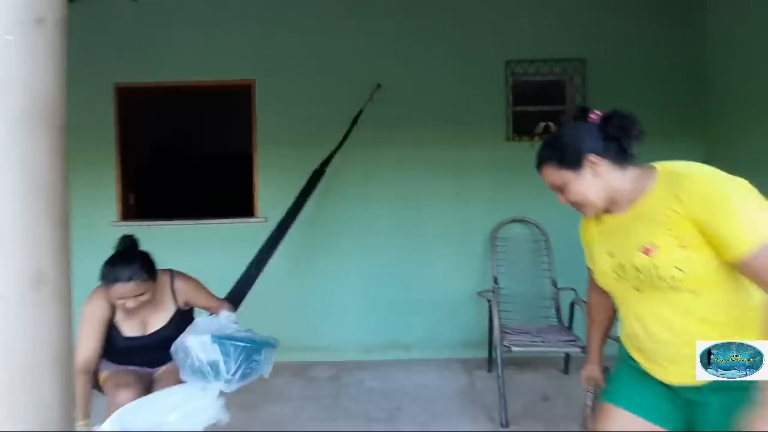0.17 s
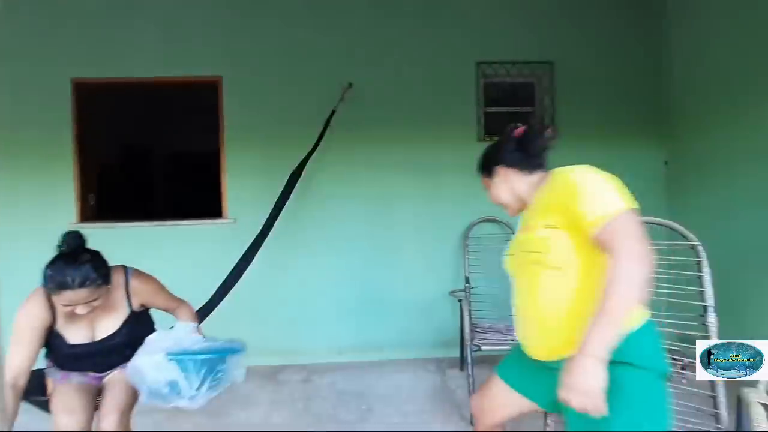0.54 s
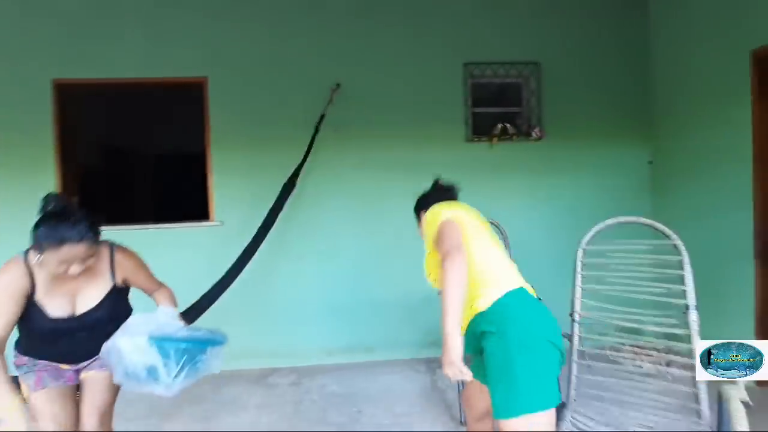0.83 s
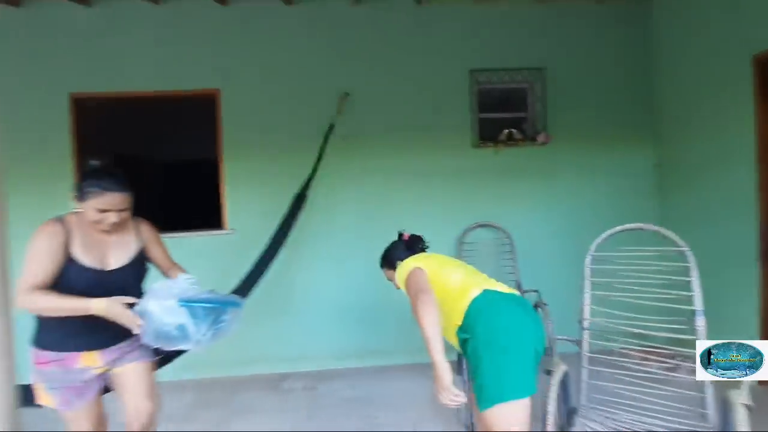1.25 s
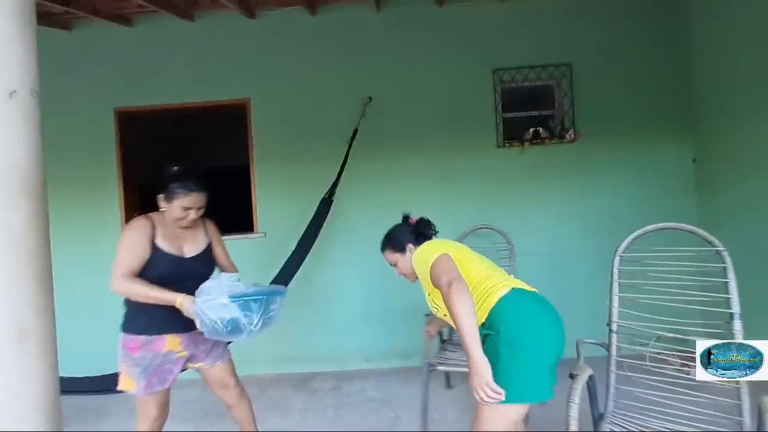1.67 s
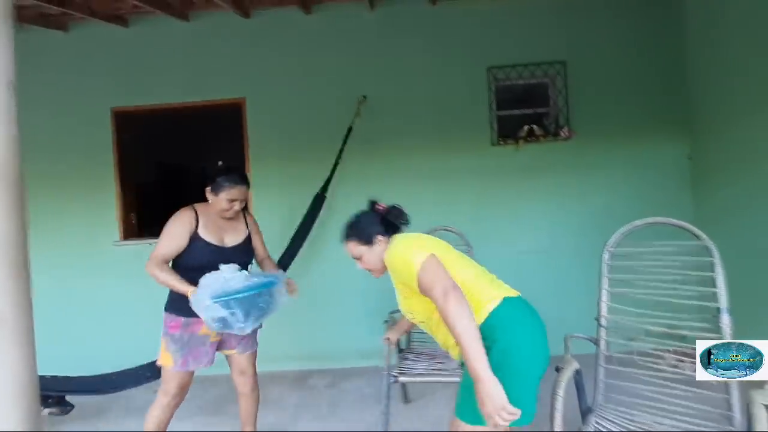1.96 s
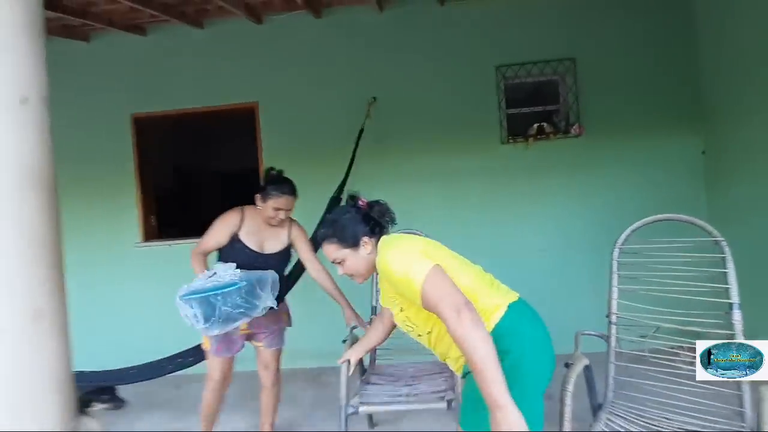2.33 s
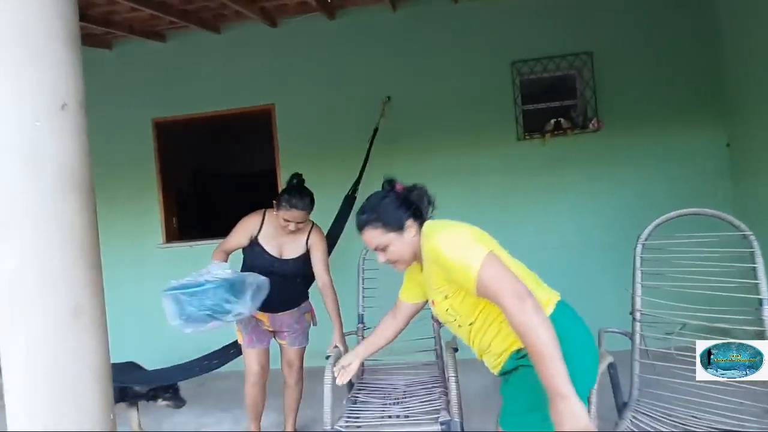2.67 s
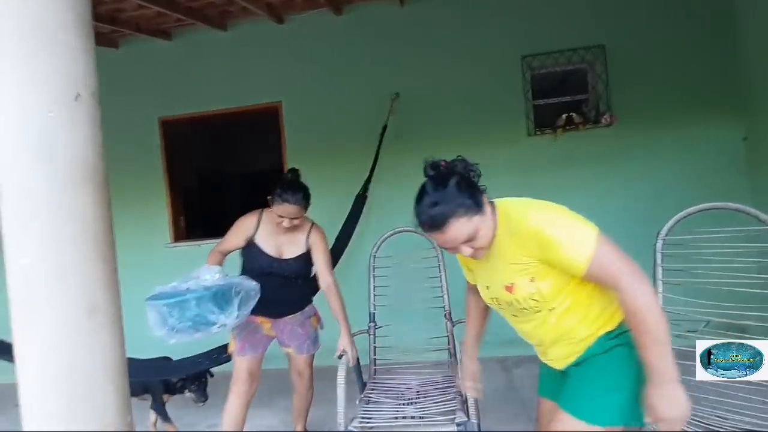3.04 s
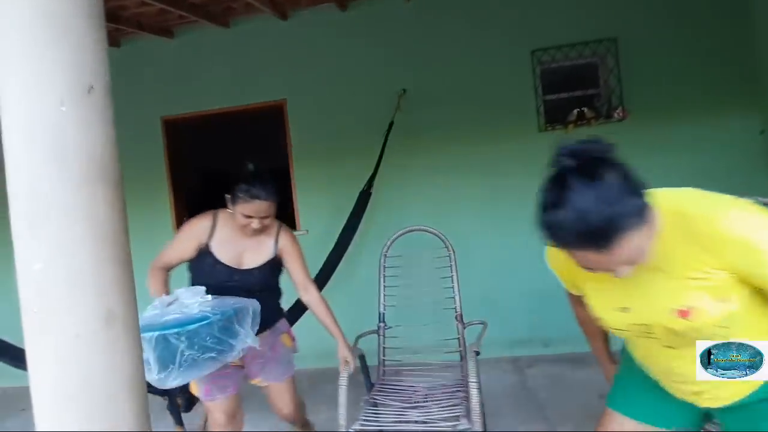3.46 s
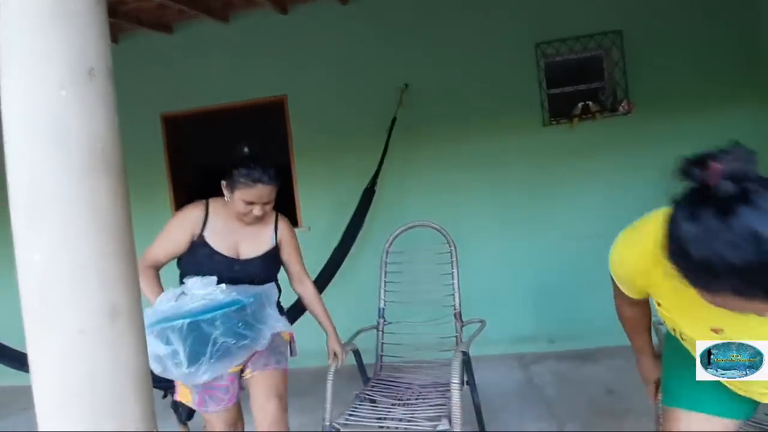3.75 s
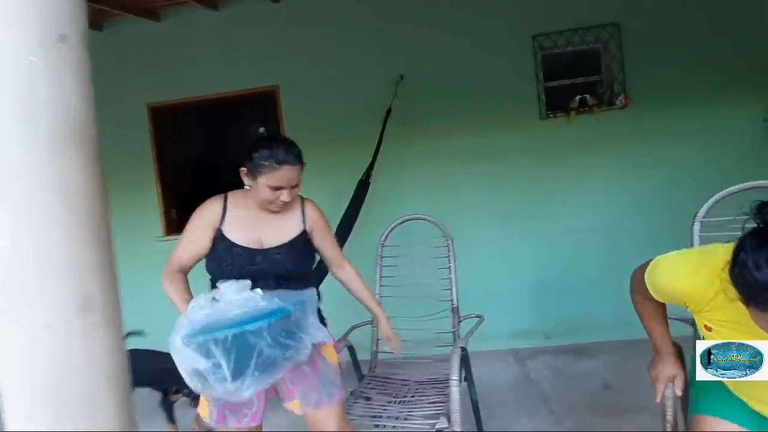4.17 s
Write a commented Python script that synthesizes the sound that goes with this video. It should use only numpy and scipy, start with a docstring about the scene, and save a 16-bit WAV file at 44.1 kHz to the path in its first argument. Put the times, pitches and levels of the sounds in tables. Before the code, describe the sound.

Plastic rustles as a chair knocks down on a porch floor; a long grating metal drag follows, then a brief scrape and soft shuffling.

```python
"""A roofed concrete porch, heard in stereo with its short echo; insects hiss far off in still air.
Tubular steel chairs are close by. One is set down with a double knock, then one is dragged in a long scrape
and a shorter one: grainy friction clicks, pulsing in lurches, drive the resonances of frame and seat.
Catching feet strike that frame, grains tick, narrow noise bands rasp, and a tube rings on as beating sines.
Around the scrapes a plastic bag rustles in tiny snaps and feet shuffle as swells of coloured noise."""
import sys
import numpy as np
from scipy import signal
from scipy.fft import rfft, irfft
from scipy.io import wavfile
from scipy.ndimage import uniform_filter1d

SR = 44100
rng = np.random.default_rng(int(sys.argv[2]) if len(sys.argv) > 2 else 0)


def digitize_waveform(pressure):
    """Quantize a signal to 16-bit integers and store it at the path in sys.argv[1].

    Rows of a 2-D input are taken as channels; values are limited to [-1, 1].
    """
    field = np.atleast_2d(pressure).T
    bounded = np.clip(field, -1, 1)
    quanta = np.round(bounded * 32767).astype(np.int16)
    wavfile.write(sys.argv[1], SR, quanta)


N = 189718
T = np.arange(N) / SR
SIZE, ONSET = 2 ** 15, 256   # length of an impulse response and where it starts (samples)
HZ = np.maximum(np.fft.rfftfreq(SIZE, 1 / SR), 1)

# All levels are those ahead of record().
# Still air and far insects, noise colours: pitch_hz, density_db (per Hz, relative)
AIR_COLOUR = [(25, 0), (100, -1), (300, -2), (600, -15), (1500, -11.5), (4000, -25), (10000, -24.5),
              (16000, -14)]
INSECT_COLOUR = [(4000, -57), (5800, -23), (6350, -6.5), (6700, 1), (7050, -7.5), (7600, -18),
                 (9000, -31.5), (12000, -63.5)]
AIR_DB, INSECT_DB = -75, -67.5

# Slides of the chair, two brief ones as it is set down, then a long and a short drag:
# start_s, full_speed_after_s, let_go_s, judder_db, grit_db, thrum_db (over judder),
# boom_db (of the seat, over judder), hiss_db (of dust, over grit); all nominal
SLIDES = [(-.05, 0.044, .005, -43, -53, 0, -4, 0.5), (.09, 0.12, 0.2, -36.5, -45.5, -8.5, -4.5, -6),
          (1.22, 0.13, 2.7245, -25.5, -32, -24.5, -7.5, 0),
          (3.341, 0.076, 3.806, -42.5, -38.5, -17.5, -3.5, 1.5)]
# Floor under the long and the short drag: time_s, roughness_db, sand_db, dust_db (over sand)
LONG_FLOOR = [(1.33, -1, -1.5, 0.5), (1.37, -1, 0.5, 2), (1.44, -2.5, -1, 2), (1.48, -3.5, 3.5, -1),
              (1.6, 0, 3, 2), (1.66, 0.5, 4, -1), (1.745, -4.5, -3, 0.5), (1.79, -0.5, 1, -1.5),
              (1.825, 0.5, 4.5, -1), (1.89, -1.5, 2, -1.5), (1.98, 1.6, 3, 2.5), (2.055, -4, -4, 0.5),
              (2.11, -1.5, -2.5, 0), (2.16, -1, -1, 0.5), (2.39, 2, 3.5, -0.5), (2.485, 0.5, 1.5, 1.5),
              (2.515, -5, 2, 0.5), (2.56, -3.5, 1.5, -0.5), (2.59, -0.5, 1, 1), (2.615, 1, 1.5, 3.5),
              (2.64, -1, 0, 5.5), (2.69, -4, -6, 4), (2.725, -4.5, -4.5, 7)]
SHORT_FLOOR = [(3.405, -4.5, -10, -1), (3.43, -5, -7.5, 0.5), (3.52, 1.5, -.5, -3.5), (3.56, 3.5, -2.5, -1),
               (3.585, 5.5, 0, 2.5), (3.61, 6.5, .5, -4), (3.655, 3, -2, 0.5), (3.73, 5, 3, -1.5),
               (3.79, 2.5, -7.5, 0), (3.815, 7.5, -2.5, 2.5)]
# The hard catch shakes the seat loose, low sounds jump and settle: start_s, thrum_db, boom_db, decay_s
JOLT = (2.528, 11, 7, 0.42)
# Fall of each sound once the chair is let go, the seat's boom slowest: judder, grit, boom (dB per s)
FALL_DB_PER_S = {"judder": 220.5, "grit": 230, "boom": 173.5}
SPEED_POWER = 1.92   # friction noise grows as this power of the speed
BOOM_SAG_DB_PER_S, THRUM_GROWTH_DB_PER_S = 5.5, 0.5   # the weight shifts forward as a drag goes on
HISS_SAG_DB_PER_S = 3.0   # the scrape grows duller as a drag goes on
LURCHES_PER_S, LURCH_WANDER = 20, .1   # stick-slip rate, and the spread of its logarithm
LURCH_SEAT_DB, LURCH_FRAME_DB = 13, 3   # swing of the seat's boom and the frame's judder in one lurch
CATCH_DB, POP_DB = -8.5, -5   # lone hard slips over the judder, lone large grains over the sand

# Overall colour of the chair on concrete: pitch_hz, level_db
CHAIR_COLOUR = [(25, -56), (50, -34), (85, -30), (105, -17.5), (170, -22), (215, -17.5), (400, -13.5),
                (1000, -11), (1850, -18.5), (2800, -13), (5000, -19), (8300, -15), (10100, -26.5),
                (11500, -16), (15500, -23)]
# Resonances of the steel frame: pitch_hz, width_hz (before the grip), lift_db; all nominal
FRAME_MODES = [(130, 7.4, 3.5), (222, 79, 6.5), (282, 53, 5.5), (558.3, 67, 8), (618, 86, 5),
               (794.5, 6.8, 7.5), (903, 14, 4), (1135, 62, 9), (1154, 18, 1.5), (1478, 60, 11.5),
               (1630, 17, 2.5), (2134, 46, 8), (2380, 190, 7.5), (2760, 70, 4.5), (3140, 130, 3.5),
               (3320, 33, 1.5), (3930, 26, 2.5), (4270, 40, 2), (4535, 240, 4.5), (5630, 400, 3)]
GRIP_HZ = 25   # width the gripping hand's damping adds to every resonance
DETUNE = .016   # the changing load on the legs detunes resonances by up to this share of their pitch

# The plastic bag is handled: start_s, level_db, rise_s, decay_s
BAG = [(-.02, -37.5, 0.0086, 0.11), (.2, -49.5, 0.062, 0.1), (.34, -57.5, 0.16, 0.21),
       (.69, -60.5, 0.092, 0.37), (.88, -57.5, 0.098, 0.036), (3.21, -79, 0.0085, 0.095),
       (3.95, -76, 0.24, 0.24), (4.262, -61, 0.015, .02)]
# Colour of its crinkle: pitch_hz, density_db (per Hz, relative)
BAG_COLOUR = [(200, -16.5), (600, -9.5), (1000, -7), (1600, 0), (4500, -1.5), (8000, -1.5), (10000, -8),
              (12000, -3), (16000, -9.5)]

# The chair dropping onto its legs: start_s, strength_db
THUMPS = [(0.0602, 10.5), (.070, 6), (0.082, 1), (.122, 8.5)]
# Colour of a thump: pitch_hz, level_db (relative)
THUMP_COLOUR = [(25, -46.5), (50, -19), (105, -8), (160, -6), (230, 4), (400, -4), (560, 1), (1000, -4),
                (1200, -17.5), (1500, -13), (1900, -24), (3000, -18), (4500, -30), (9000, -40.5),
                (15000, -45)]
# Feet catching on the concrete: start_s, strength_db, contact_cutoff_hz, seat_lift_db
KNOCKS = [(1.306, -4.5, 1400, 11), (1.351, -1.5, 9400, 10), (1.386, -8, 3000, 6), (1.426, -2.5, 800, 0.5),
          (1.467, 3, 1500, 11), (1.522, 4, 790, 3), (1.623, 2, 1400, 3), (1.686, 6.5, 1100, -2),
          (1.815, 1.5, 6000, -3.5), (1.900, -1, 1500, 2.5), (2.302, 0, 1300, -2), (2.428, -2, 1500, 6.5),
          (2.468, 2.5, 3000, 0), (2.526, 4, 900, 2), (2.5316, 12, 14000, -4.5), (2.535, 5, 4526, 1),
          (2.545, 0, 150, -1), (2.579, 6, 1300, 1.5), (2.584, -4, 135, 1), (2.654, 1.5, 1690, 5),
          (2.720, -0.5, 1300, 7), (2.798, -6.5, 1000, 2.5), (2.850, -16.5, 493, 11.5), (3.378, -22, 400, 6),
          (3.403, -18.5, 4000, 16.5), (3.532, -8, 896, 6), (3.772, -4, 1182, -2), (3.795, -7, 350, -3),
          (3.828, -1.5, 1510, -2.5)]
SEAT_LOW_HZ, SEAT_HZ = 85, 350   # the seat booms between these

# Coarse grains crack under a chair foot or a sole:
# start_s, strength_db, low_edge_hz, high_edge_hz, early_echo_decay_s
CRACKS = [(.060, -10.5, 4600, 15100, 0.12), (0.121, -14.5, 4400, 15000, 0.016),
          (2.5312, -1, 5010, 15660, .003), (3.2125, -46, 1600, 4500, .012),
          (3.403, -16.5, 1500, 15000, 0.014), (3.566, -15, 7000, 15500, .004),
          (3.717, -7.5, 10500, 15000, .004), (3.85, -15, 10000, 15600, 0.0027),
          (4.158, -40, 200, 3510, 0.0064), (4.186, -41.5, 1490, 11000, 0.01),
          (4.239, -46, 1200, 7000, .006)]
# Narrow rasps: rubs of tube ends and soles on smooth concrete, and, during the drags, brief squeals as one
# resonance of the chair frame sings: start_s, pitch_hz, width_hz, level_db, rise_s, decay_s
RASPS = [(.208, 3410, 580, -51.5, 0.091, 0.065), (0.231, 2600, 308, -50.5, 0.041, 0.066),
         (.27, 1353, 710, -54, 0.042, 0.083), (0.302, 2280, 110, -57.5, 0.082, 0.066),
         (.92, 577, 94, -69.5, 0.026, 0.063), (1.17, 280, 200, -72, .07, .04),
         (1.676, 1180, 111, -29, 0.022, 0.028), (1.72, 1680, 70, -35.5, .04, 0.045),
         (2.204, 1490, 69.9, -30, .015, 0.022), (2.374, 1501, 70, -25, .02, .02),
         (2.44, 2430, 199.4, -29.5, 0.06, .012), (2.476, 3000, 610, -31, .022, 0.0072),
         (3.210, 2450, 1790, -61, 0.014, 0.042), (3.345, 2750, 110.3, -68, 0.042, .04),
         (3.674, 2700, 1100, -37, 0.013, 0.033), (3.828, 1440, 160, -36.5, .008, 0.02)]

# Soft treads and scuffing sandals: start_s, level_db, rise_s, decay_s
TREADS = [(.49, -61, 0.05, 0.035), (.715, -61.5, 0.022, 0.045), (.82, -68, .03, 0.044),
          (1.12, -70, 0.06, 0.044)]
SCUFFS = [(4.035, -58, 0.034, 0.05), (4.157, -71, 0.0026, 0.065), (4.185, -69.5, 0.011, 0.12),
          (4.25, -64.5, 0.021, 0.035)]
# Their colours: pitch_hz, density_db (per Hz, relative)
TREAD_COLOUR = [(25, -18), (70, 10), (110, -11.5), (200, -30), (600, -52), (2000, -69)]
SCUFF_COLOUR = [(100, -23), (400, -1.5), (850, -8.5), (1600, 3), (3000, -3), (4600, -8), (8000, -16.5),
                (16000, -30.5)]

# Modes of one lightly damped tube: pitch_hz, t60_s, level_db (at the start)
TUBE_MODES = [(2074, 1.7, -69), (2082.4, 1.8, -71.8), (2077, .3, -50)]
TUBE_S, TUBE_WAVER = 2.80, .3   # start near the end of the long drag (s), waver of phase (radians)

# Porch echo: pitch_hz, t60_s
PORCH_T60 = [(100, 0.36), (300, 0.45), (1000, 0.26), (4000, 0.35), (14000, 0.054)]
# Likeness of the left and right channels: pitch_hz, correlation (no unit)
LIKENESS = [(60, .92), (200, 0.96), (600, 0.81), (1000, 0.22), (1500, 0.18), (3000, 0.085), (15000, 0.18)]
# Balance of the channels: pitch_hz, left_minus_right_db
BALANCE = [(100, 0.5), (300, 1.5), (700, -1), (1250, -3), (1700, -5.5), (2200, 0.5), (3300, -1.5),
           (6000, 0.6), (9000, -0.5), (12000, -5), (15500, -1.5)]
CUTOFF_HZ = 15700


def from_db(db):
    """Decibels to gain."""
    return 10 ** (np.asarray(db) / 20)


def rms_one(x):
    """Scale to rms 1."""
    return x / np.sqrt(np.mean(x ** 2) + 1e-20)


def at_hz(points):
    """A table read along the logarithmic frequency axis."""
    hz, value = np.transpose(points)
    return np.interp(np.log(HZ), np.log(hz), value)


def drift(rate):
    """Slow random wander of spread 1: noise through two equal low-pass poles at this rate (Hz)."""
    step = 40   # computed on every 40th sample
    pole = np.exp(-2 * step * np.pi * rate / SR)
    raw = rng.standard_normal(N // step + 2002)
    slow = signal.lfilter([1], [1, -2 * pole, pole * pole], raw)[2000:]
    return np.interp(np.arange(N) / step, np.arange(len(slow)), rms_one(slow))


def below(hz, order=4):
    """Gain of a low-pass."""
    return 1 / np.sqrt(1 + (HZ / hz) ** (2 * order))


def above(hz, order=4):
    """Gain of a high-pass."""
    return 1 / np.sqrt(1 + (hz / HZ) ** (2 * order))


def causal(gain):
    """The minimum-phase response with this gain: it rings only after it is struck."""
    cepstrum = irfft(np.log(gain + 1e-6))
    return np.exp(rfft(2 * cepstrum[:SIZE // 2], SIZE) - cepstrum[0])


def two_ears(pair):
    """Two unrelated signals become left and right spectra, most alike in the bass."""
    mid, side = rfft(pair, SIZE)
    alike = np.clip(at_hz(LIKENESS), -.99, .99)
    return np.sqrt(1 + alike) * mid + np.sqrt(1 - alike) * side * [[1], [-1]]


def porch(direct_db, tail_db, early_s=0.016, lag_s=.00008):
    """One path to the microphone: direct sound, quick echoes off floor and walls, a tail that dies by band."""
    t = np.arange(SIZE) / SR
    sparse = rng.standard_normal((2, SIZE)) * (rng.random((2, SIZE)) < .04)
    early = sparse * np.exp(-t / early_s) * (t > .001)
    path = two_ears(rms_one(early)) / np.sqrt(2 * SIZE)
    diffuse = two_ears(rng.standard_normal((2, SIZE)))
    for k, (hz, t60) in enumerate(PORCH_T60):
        band = at_hz([(row[0], float(j == k)) for j, row in enumerate(PORCH_T60)])
        dying = rms_one(from_db(-60 * t / t60)) / np.sqrt(2 * SIZE)
        path = path + from_db(tail_db) * rfft(irfft(diffuse * band) * dying)
    # the right channel hears the direct sound one lag after the left
    direct = np.exp(-2j * np.pi * HZ * lag_s * np.array([[1], [2]]))
    return (path + from_db(direct_db) * direct) * from_db(at_hz(BALANCE) * [[.5], [-.5]])


def response(gain, path):
    """Stereo impulse response of a body heard along a path, its mid of unit energy; it starts at ONSET."""
    fade = np.minimum(np.linspace(2, 0, SIZE), 1) ** 2
    h = np.roll(irfft(causal(gain) * path), ONSET, axis=1) * fade
    return h / np.sqrt(np.sum(h.mean(axis=0) ** 2))


def play(force, h):
    """A force heard through an impulse response."""
    return signal.fftconvolve(force[None], h, axes=1)[:, ONSET:ONSET + N]


def add(out, s, h):
    """Lay a sound into the mix at time s."""
    at = int(s * SR) - ONSET
    h, at = h[:, max(-at, 0):N - at], max(at, 0)
    out[:, at:at + h.shape[1]] += h


def wash(colour, pair):
    """Two unrelated noises become diffuse stereo sound of a given colour, rms 1."""
    gain = from_db(at_hz(colour))
    mid, side = [np.roll(irfft(gain * two_ears(part[:, None])), ONSET, axis=1) for part in np.eye(2)]
    return rms_one(play(pair[0], mid) + play(pair[1], side))


def noise(colour):
    """Smooth stereo noise of a given colour, rms 1."""
    return wash(colour, rng.standard_normal((2, N)))


def swells(rows):
    """Sum of short gestures that rise in a line and die away exponentially."""
    total = 0
    for s, db, rise, decay in rows:
        dying = np.exp(-np.maximum(T - s - rise, 0) / decay)
        total = total + from_db(db) * np.clip((T - s) / rise, 0, 1) * dying
    return total


def grains(per_s, spread_db, clump_db, clump_rate):
    """Random clicks of uneven size that come in clumps; rms near 1 over short stretches."""
    sizes = from_db(spread_db * np.minimum(rng.exponential(1, N), 3)) * rng.choice([-1, 1], N)
    clicks = sizes * (rng.random(N) < per_s / SR) * from_db(clump_db * drift(clump_rate))
    return clicks / np.sqrt(np.abs(uniform_filter1d(clicks ** 2, size=2000)) + 1e-9)


def yard():
    """Still air and far insects: two steady coloured noises, the insects wavering slightly in level."""
    air = from_db(AIR_DB) * noise(AIR_COLOUR)
    insects = from_db(INSECT_DB + 0.74 * drift(8)) * noise(INSECT_COLOUR)
    return air + insects


def slides():
    """Each slide gathers speed, holds and dies away when let go; gains of judder, grit, thrum, boom and hiss."""
    s, rough_db, sand_db, dust_db = np.transpose(list(LONG_FLOOR) + list(SHORT_FLOOR))
    rough, sand, dust = [from_db(np.interp(T, s, db)) for db in (rough_db, sand_db, dust_db)]
    jolt_s, jolt_thrum_db, jolt_boom_db, jolt_decay = JOLT
    shaken = (T > jolt_s) * np.exp(-np.abs(T - jolt_s) / jolt_decay)
    out = 0
    for start, rise, let_go, judder_db, grit_db, thrum_db, boom_db, hiss_db in SLIDES:
        since, after = np.maximum(T - start, 0), np.maximum(T - let_go, 0)
        drive = np.minimum(since / rise, 1) ** SPEED_POWER
        judder = drive * rough * from_db(judder_db - FALL_DB_PER_S["judder"] * after)
        seat = drive * rough * from_db(judder_db - FALL_DB_PER_S["boom"] * after)
        grit = drive * sand * from_db(grit_db - FALL_DB_PER_S["grit"] * after)
        thrum = judder * from_db(thrum_db + jolt_thrum_db * shaken + THRUM_GROWTH_DB_PER_S * since)
        boom = seat * from_db(boom_db + jolt_boom_db * shaken - BOOM_SAG_DB_PER_S * since)
        hiss = grit * dust * from_db(hiss_db - HISS_SAG_DB_PER_S * since)
        out = out + np.array([judder, grit, thrum, boom, hiss])
    return out


def frame(uneven=0.49, ripple_db=2.5, ripple_hz=130, detune=DETUNE):
    """Gain of the chair from one contact point: each stirs and detunes the resonances in its own way."""
    chance = rng.uniform(-0.84, 1, (len(FRAME_MODES), 2))
    lift_db = 0
    for (hz, width, db), (a, b) in zip(FRAME_MODES, chance):
        offset = (HZ - hz * (1 + detune * b)) / (width + GRIP_HZ)
        lift_db = lift_db + db * (1 + uneven * a) / (1 + (2 * offset) ** 2)
    ripple = np.interp(HZ / ripple_hz, np.arange(1000), rng.uniform(-1.5, 1.5, 1000))
    crowded = above(600, order=1)   # the small resonances are sparse in the bass
    return from_db(at_hz(CHAIR_COLOUR) + lift_db + ripple_db * ripple * crowded)


def flutter(depth_db, rate):
    """A quick uneven gain whose power stays level over longer stretches."""
    gain = from_db(depth_db * np.clip(drift(rate), -2, 2))
    return gain / np.sqrt(uniform_filter1d(gain ** 2, size=3000))


def with_jolts(steady, per_s, share_db):
    """Dense clicks with a few much larger ones among them, at the same overall power."""
    lone = (rng.random(N) < per_s / SR) * rng.choice([-1, 1], N) * rng.uniform(0.34, 1, N)
    return (steady + from_db(share_db) * rms_one(lone)) / np.hypot(1, from_db(share_db))


def lurches():
    """The legs bend, slip and stick again at a nearly even rate: 1 at each slip, sinking to 0 before the next."""
    turns = np.cumsum(LURCHES_PER_S * np.exp(LURCH_WANDER * drift(6))) / SR
    return 1 - turns % 1


def pulsing(slip, depth_db):
    """A gain of mean power 1 that follows the slips."""
    return rms_one(from_db(depth_db * slip))


def band_force(clicks, band, body):
    """One band of a force, scaled so that the body answers with the same level."""
    share = np.sqrt(np.sum((body * band) ** 2) / np.sum(body ** 2))
    return signal.fftconvolve(clicks, irfft(causal(band)))[:N] / share


def friction(thrum_hz=160, boom_hz=380, grit_hz=1850, hiss_hz=4900):
    """One pair of feet slips and catches, shaking frame and seat, and crushes sand grains as it goes."""
    judder, grit, thrum, boom, hiss = slides()
    body = frame(uneven=0, ripple_db=0, detune=0)
    # rough floor: one uneven gain shared by the low scraping bands of this pair of feet
    bumps = flutter(depth_db=3.0, rate=51)
    low_clicks, boom_clicks = [
        with_jolts(bumps * grains(per_s=800, spread_db=1.5, clump_db=2.0, clump_rate=160),
                   per_s=30, share_db=CATCH_DB) for kind in range(2)]
    crush = flutter(depth_db=3.5, rate=44)   # sand breaks in short bursts
    sand, dust = [
        with_jolts(crush * grains(per_s=4500, spread_db=4.5, clump_db=2.0, clump_rate=410),
                   per_s=45, share_db=POP_DB) for kind in range(2)]
    slip = lurches()
    seat, legs = pulsing(slip, LURCH_SEAT_DB), pulsing(slip, LURCH_FRAME_DB)
    judder_band = above(boom_hz) * below(grit_hz, order=6)
    grit_band = above(grit_hz, order=6) * below(hiss_hz, order=8)
    return (band_force(thrum * seat * low_clicks, below(thrum_hz, order=8), body)
            + band_force(boom * seat * boom_clicks, above(thrum_hz) * below(boom_hz), body)
            + band_force(from_db(-1.04) * judder * legs * low_clicks, judder_band, body)
            + band_force(from_db(0.5) * grit * sand, grit_band, body)
            + band_force(hiss * dust, above(hiss_hz, order=8), body))


def dragging(count=7):
    """Front and back feet scrape on their own; the weight rocks, so the frame answers anew on each short stretch."""
    out = np.zeros((2, N))
    paths = [porch(direct_db=-11.5, tail_db=-4.5) for k in range(count)]
    step = int(.075 * SR)
    blend = np.sin(np.linspace(0, np.pi, 2 * step))   # neighbouring stretches overlap by half
    for feet in range(2):
        force = np.pad(friction(), step) / np.sqrt(2)
        for k, start in enumerate(range(0, N - step, step)):
            stretch = force[start:start + 2 * step] * blend
            if np.abs(stretch).max() > 1e-5:   # skip near silence
                h = response(frame(), paths[(k + 2 * feet) % count])
                add(out, (start - step) / SR, signal.fftconvolve(stretch[None], h, axes=1))
    return out


def bag():
    """Thin plastic crinkles all over in dense tiny snaps that merge into an even hiss."""
    snaps = [grains(per_s=16000, spread_db=1, clump_db=1, clump_rate=40) for side in range(2)]
    return swells(BAG) * wash(BAG_COLOUR, snaps)


def cracking():
    """Single grains burst with a sharp, thin tick: a band-limited click and its echo."""
    out = np.zeros((2, N))
    for s, db, low_hz, high_hz, decay in CRACKS:
        path = porch(direct_db=-12.5, tail_db=-11.5, early_s=decay)
        add(out, s, from_db(db) * response(above(low_hz) * below(high_hz), path))
    return out


def knocking():
    """The dropped chair thumps dully; a catching foot rings frame and seat, brighter the harder the contact."""
    out = np.zeros((2, N))
    for s, db in THUMPS:
        path = porch(direct_db=0.5, tail_db=2.5, early_s=0.0082)
        add(out, s, from_db(db) * response(from_db(at_hz(THUMP_COLOUR)), path))
    paths = [porch(direct_db=-7.5, tail_db=-13.5, early_s=0.017) for k in range(5)]
    for k, (s, db, contact_hz, seat_db) in enumerate(KNOCKS):
        hardness = below(contact_hz, order=4) + from_db(-31)
        contact = hardness * from_db(seat_db * below(SEAT_HZ)) * above(SEAT_LOW_HZ, order=3)
        struck = frame(uneven=0.04, ripple_db=6.5) * contact
        add(out, s, from_db(db) * response(struck, paths[k % len(paths)]))
    return out


def rasping():
    """Brief rubs and frame squeals, each sounding one narrow band of noise."""
    out = np.zeros((2, N))
    t = np.maximum(np.arange(SIZE) - ONSET, 0) / SR
    for s, hz, width_hz, db, rise, decay in RASPS:
        edges = [max(hz - width_hz / 2, 100), hz + width_hz / 2]
        band = signal.butter(3, edges, "band", fs=SR, output="sos")
        # the first half is dropped while the filter settles
        rub = rms_one(signal.sosfilt(band, rng.standard_normal((2, 2 * SIZE)))[:, SIZE:])
        swell = np.minimum(t / rise, 1) * np.exp(-np.maximum(t - rise, 0) / decay)
        add(out, s, from_db(db) * swell * np.sqrt(2) * rub)   # root 2: the mid has the tabled level
    return out


def shuffling():
    """Soft low treads, then sandals scuffing: short swells of coloured noise."""
    treads = swells(TREADS) * noise(TREAD_COLOUR)
    scuffs = swells(SCUFFS) * noise(SCUFF_COLOUR)
    return treads + scuffs


def tube():
    """One tube keeps singing after the long drag; its close modes beat and waver."""
    t = np.maximum(T - TUBE_S, 0)   # held at 0 ahead of the start, where only the slow waver moves
    ring = 0
    for hz, t60, db in TUBE_MODES:
        phase = 2 * np.pi * hz * t + TUBE_WAVER * drift(15)
        ring = ring + from_db(db - 60 * t / t60) * np.sin(phase)
    return ring


def scene():
    """Chairs, bag and feet over the quiet of the yard."""
    chairs = dragging() + knocking() + cracking() + tube() + rasping()
    return chairs + bag() + shuffling() + yard()


def record(dry):
    """The highest peaks are rounded, the level is set a little lower and the top is cut steeply."""
    rounded = 0.74 * np.tanh(dry / 0.86)
    top_cut = signal.ellip(12, .1, 80, CUTOFF_HZ, fs=SR, output="sos")
    return signal.sosfilt(top_cut, rounded)


dry = scene()
out = record(dry)
digitize_waveform(out)
```